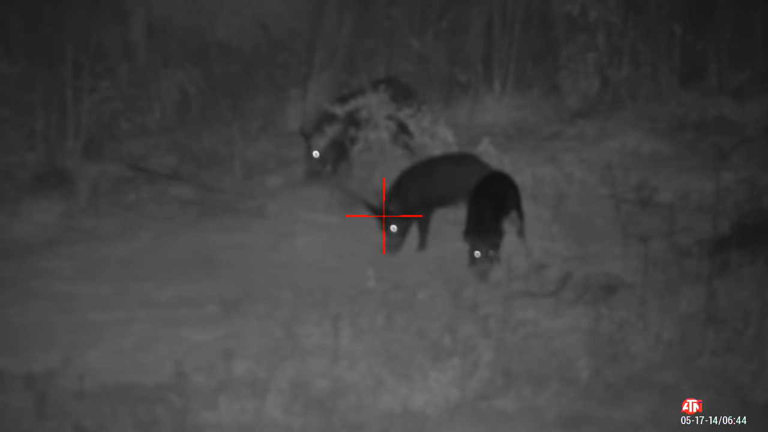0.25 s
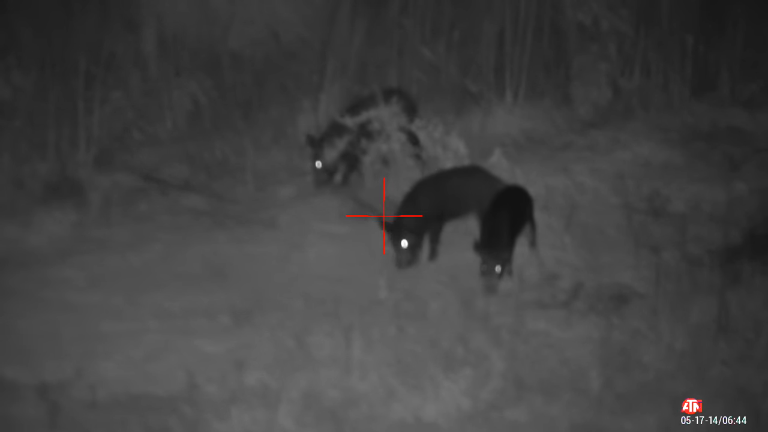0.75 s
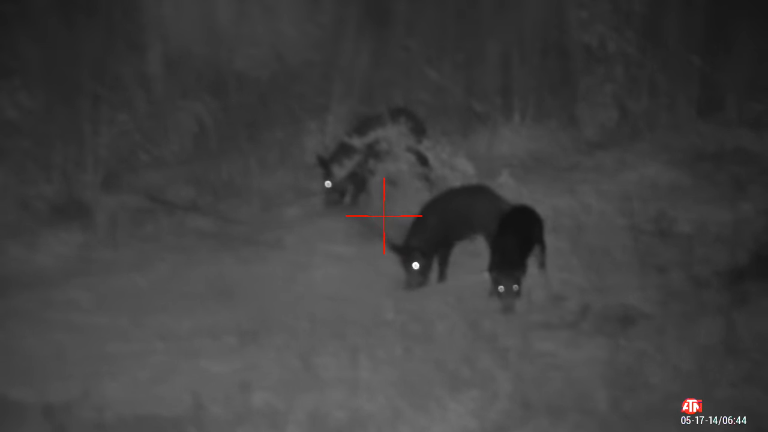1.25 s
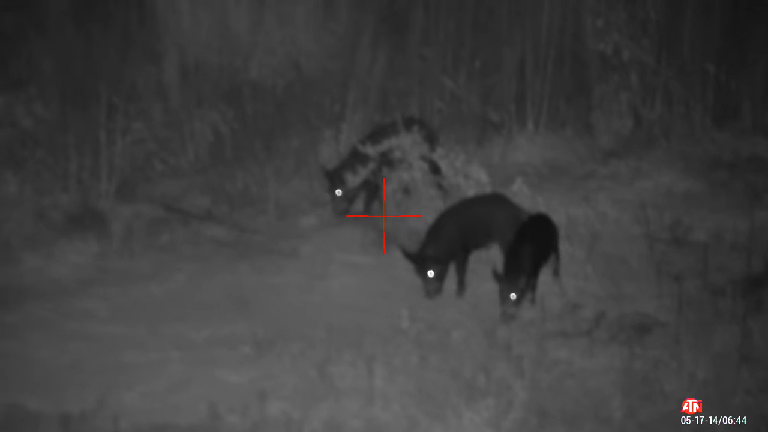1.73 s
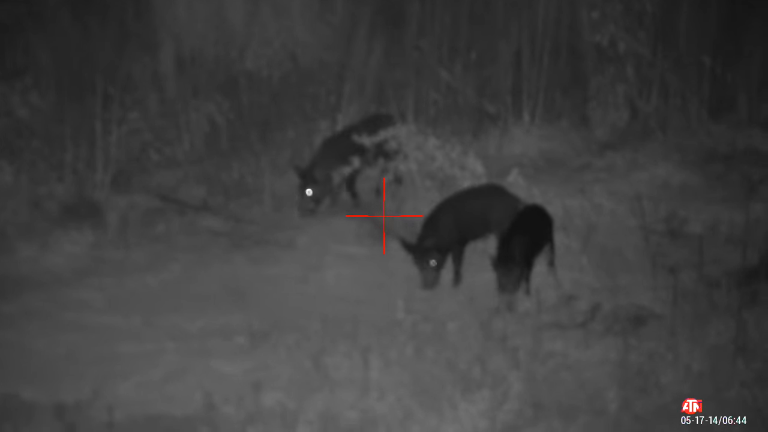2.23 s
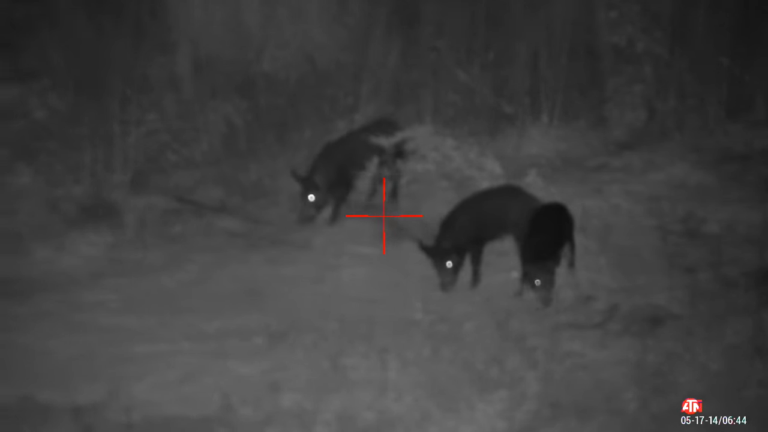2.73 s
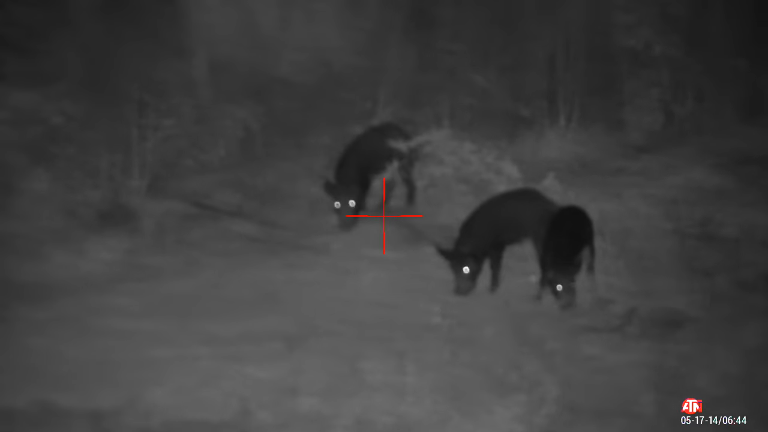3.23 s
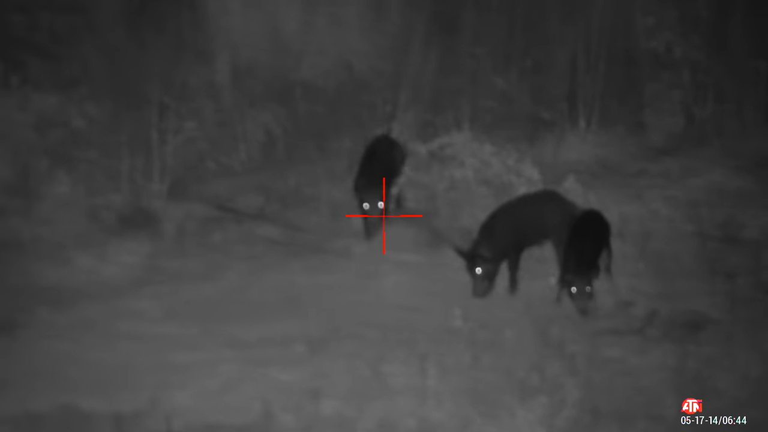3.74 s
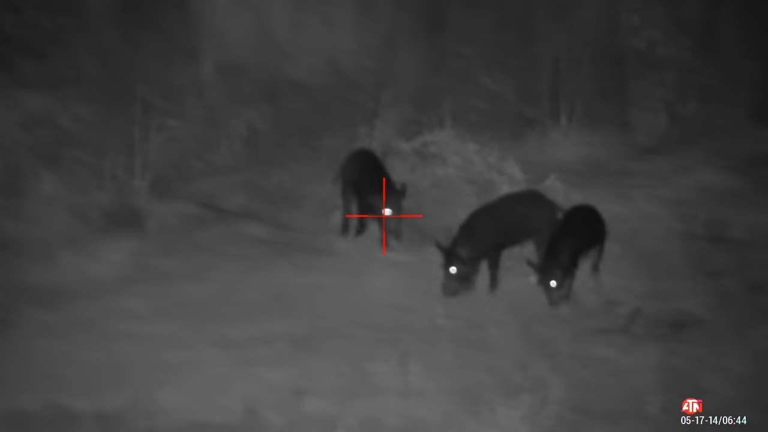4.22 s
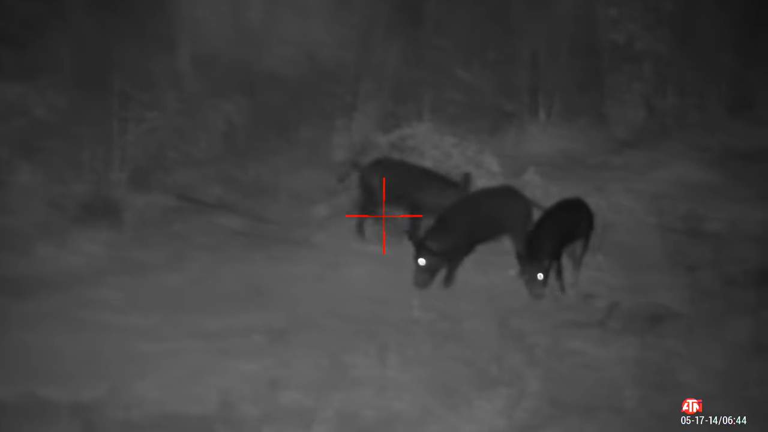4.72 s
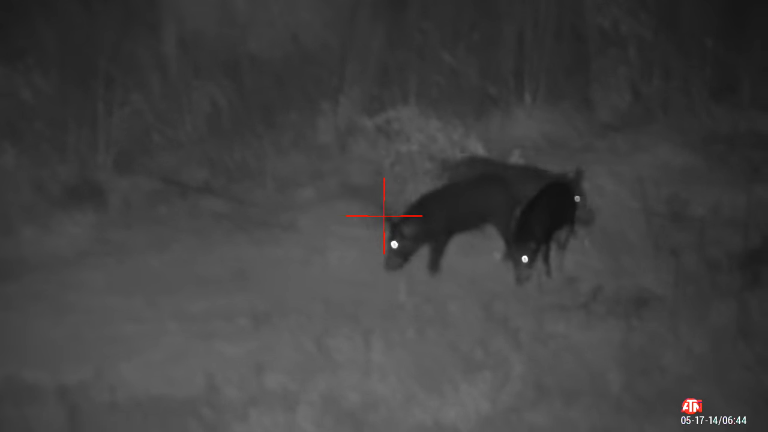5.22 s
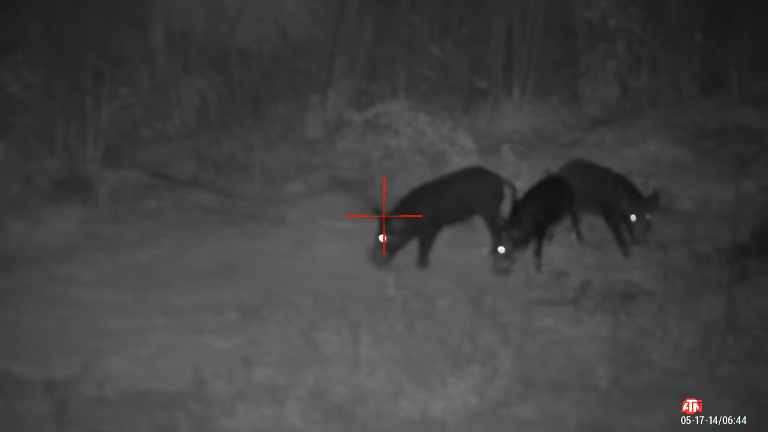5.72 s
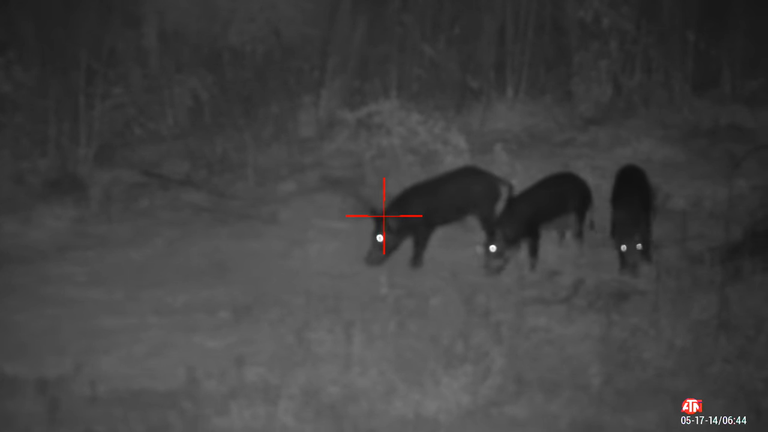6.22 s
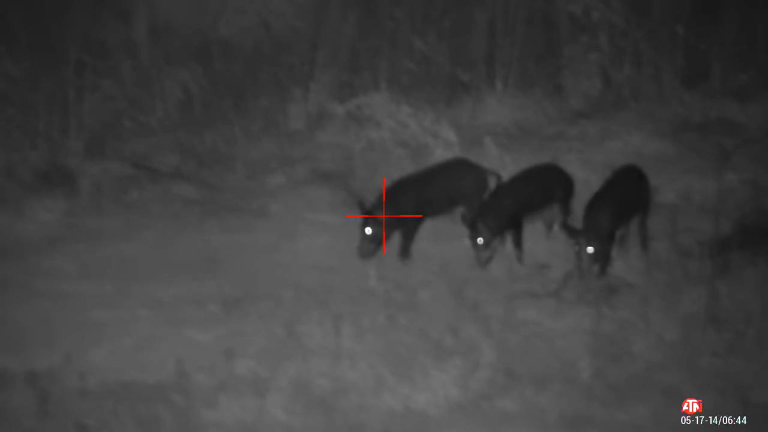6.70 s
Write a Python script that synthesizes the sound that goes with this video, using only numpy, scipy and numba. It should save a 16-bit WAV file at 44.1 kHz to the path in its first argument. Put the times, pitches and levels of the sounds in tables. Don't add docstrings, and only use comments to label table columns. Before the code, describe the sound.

High-pitched insects ring without pause across a dark clearing, over soft hiss and a faint low electrical buzz, with small twig snaps from foraging pigs.

```python
import sys
import numpy as np
from scipy import signal
from scipy.fft import rfft, irfft
from scipy.io import wavfile
from numba import njit

SR = 44100
rng = np.random.default_rng(int(sys.argv[2]) if len(sys.argv) > 2 else 0)


def generate_wav(signal):
    frames = np.transpose(np.atleast_2d(signal))
    scaled = np.clip(frames, -1, 1) * 32767
    pcm = np.round(scaled).astype(np.int16)
    wavfile.write(sys.argv[1], SR, pcm)


def ratio_of_db(decibels):
    return 10 ** (np.asarray(decibels, float) / 20)


N = 306936


def level(x, db):
    return x * ratio_of_db(db) / np.sqrt(np.mean(x ** 2))


@njit
def strokes(start, length, hz, fall, size, phase):
    out = np.zeros(N)
    for j in range(len(start)):
        n = int(length[j])
        tone = size[j] * np.exp(1j * phase[j])
        step = np.exp(2j * np.pi * hz[j] * (1 + fall[j] / 2) / SR)
        bend = np.exp(-2j * np.pi * hz[j] * fall[j] / SR / n)
        window, turn = 1 + 0j, np.exp(2j * np.pi / n)
        for i in range(int(start[j]), int(start[j]) + n):
            if 0 <= i < N:
                out[i] += tone.imag * (1 - window.real) ** 2 / 4
            tone *= step
            step *= bend
            window *= turn
    return out


# f/Hz, level/dB [per Hz]
HISS_COLOUR = [(25, -128), (60, -116), (100, -108), (140, -103), (200, -98), (300, -91), (500, -90),
               (1000, -92), (2350, -97.5), (4150, -92), (7000, -101.3), (9000, -104.5), (13600, -106.5),
               (14700, -104)]


def hiss():
    hz, db = np.transpose(HISS_COLOUR)
    bins = np.arange(N // 2 + 1) * SR / N + 1
    colour = ratio_of_db(np.interp(np.log(bins), np.log(hz), db)) * np.sqrt(SR / 2)
    return irfft(rfft(rng.standard_normal(N)) * colour, N)


# f/picture rate [multiple], level/dB
BUZZ_PARTIALS = [(2, -106.0), (3, -97.4), (4, -86.1), (5, -85.0), (6, -76.7), (7, -76.5), (8, -79.3),
                 (9, -80.8), (10, -72.3), (11, -70.2), (12, -72.1), (13, -71.7), (14, -80.1), (15, -74.1),
                 (16, -76.0), (17, -77.1), (18, -88.0), (19, -80.8), (20, -81.2), (22, -70.4), (25, -85.2),
                 (26, -84.2), (27, -84.2), (35, -92.3), (44, -79.1), (66, -87.0)]
PICTURE_HZ = 30000 / 1001
BUZZ_DELAY, BUZZ_NOTCHES = 0.2, (9, 15.5)
BUZZ_LAG = 0.5


def buzz():
    turns = np.arange(N) * PICTURE_HZ / SR - BUZZ_DELAY
    out = np.zeros(N)
    for k, db in BUZZ_PARTIALS:
        sign = (-1) ** np.searchsorted(BUZZ_NOTCHES, k)
        out += np.sqrt(2) * ratio_of_db(db) * sign * np.cos(2 * np.pi * k * turns - BUZZ_LAG)
    return out


# t/s, f/Hz, length/s, fall of pitch [0-1], peak level/dB
PIG_SOUNDS = [
    (.565, 115, 0.026, 0.3, -66),
    (.905, 520, 0.054, 0, -56),
    (.955, 456, 0.054, 0.1, -52),
    (2.225, 105, .04, .3, -71),
    (3.494, 1650, 0.0054, 0.4, -50),
    (3.853, 105, .04, .3, -68),
    (4.061, 2380, .004, 0, -42),
    (5.218, 105, .04, .3, -71),
    (5.37, 2350, .006, .1, -48),
    (6.6, 1516, .035, 0, -62),
]


def pigs():
    s, hz, length_s, fall, db = np.transpose(PIG_SOUNDS)
    return strokes(s * SR, length_s * SR, hz, fall, ratio_of_db(db), 0 * s)


GLIDE = 0.011


def trill(hz, scatter_hz, rate, first_s, duty, slip, chance):
    jitter, pitch, size, turn = chance.T
    stroke = np.arange(-1, len(turn) - 1)
    start = np.round((first_s + (stroke - duty / 2 + 0.027 * jitter) / rate) * SR)
    phase = 2 * np.pi * hz * start / SR + slip * np.cumsum(turn)
    flat = np.ones(len(turn))
    return np.array([start, flat * duty * SR / rate, hz + scatter_hz * pitch,
                     GLIDE * flat, ratio_of_db(1.26 * size), phase])


def crowd(hz, spread_hz, rate, duty, db, count):
    place = np.linspace(-2.6, 2.6, count)
    own = rng.standard_normal((count, 3))
    chance = np.clip(rng.standard_normal((count, 520, 4)), -2, 2)
    singers = []
    for p, (tempo, lag, far), c in zip(place, own, chance):
        own_rate = rate * (1 + 0.08 * np.tanh(tempo))
        start, length, pitch, fall, size, phase = trill(
            hz + spread_hz * p, 0.28 * spread_hz, own_rate, lag / rate, min(duty, 1), np.pi, c)
        size = size * ratio_of_db(far - 3.02 * p * p)
        singers.append(np.array([start, 0.92 * length, pitch, 0.78 * fall, size, 0.99 * phase]))
    return level(strokes(*np.concatenate(singers, axis=1)), db)


# wing f/Hz, spread f/Hz, pulse rate [per s], share of the cycle sounding [0-1], level/dB
FAR_CROWDS = [(4872, 195, 45., 0.53, -40.5), (3481, 215, 44., 0.53, -49), (2100, 45, 50., 0.73, -62),
              (5605, 110, 50., 0.57, -54), (2672, 70, 43., 0.61, -64.5), (3073, 87, 32., 0.67, -63),
              (7830, 400, 55., 0.32, -72.5), (12200, 450, 53, 0.3, -84), (6490, 240, 56, 0.42, -72),
              (5650, 290, 40., .45, -55.5)]
CROWD_SIZES = (130, 110, 24, 30, 16, 18, 60, 60, 50, 80)
# t/s, level/dB
MAIN_EFFORT = [(0.0, -41), (0.02, -38.5), (0.56, -41), (5.35, -40), (5.66, -41.5), (5.7, -36.5),
               (5.74, -39.5), (5.91, -41), (6.82, -40), (6.96, -40)]
# which crowd, chirp rate [per s], crest of the first chirp t/s
CHIRP_BEATS = [(1, 3.13, .128), (3, 12.41, -.004)]
# rise at the crest level/dB, sharpness [power]
CHIRP_CRESTS = [(3.0, 3.5), (5.0, 1.1)]


def far_crickets():
    t = np.arange(N) / SR
    songs = [crowd(*row, count=n) for row, n in zip(FAR_CROWDS, CROWD_SIZES)]
    s, db = np.transpose(MAIN_EFFORT)
    songs[0] = songs[0] * level(ratio_of_db(np.interp(t, s, db)), 0)
    for (k, rate, first_s), (rise_db, sharp) in zip(CHIRP_BEATS, CHIRP_CRESTS):
        crest = np.abs(np.cos(np.pi * rate * (t - first_s))) ** (2 * sharp)
        songs[k] = songs[k] * level(ratio_of_db(rise_db * crest), 0)
    return sum(songs)


def solo(scatter_hz, duty, slip, db, from_s, to_s, hz, rate, first_s):
    chance = rng.standard_normal((480, 4))
    song = level(strokes(*trill(hz, scatter_hz, rate, first_s, min(duty, 1), slip, chance)), db)
    t = np.arange(N) / SR
    return song * np.clip(np.minimum(t - from_s + 0.026, to_s - t) / 0.03, 0, 1)


WOODS_T60_S, WOODS_DB = 0.64, 1


def woods(x, size=8192):
    t = np.arange(SR // 2) / SR
    shape = np.exp(-np.log(1000) * t / WOODS_T60_S) * np.clip(t / 0.0058, 0, 1)
    wet = np.zeros(N + 2 * SR)
    padded = np.pad(x, (size // 2, size))
    fade = np.sin(np.pi * np.arange(size) / size)
    for i in range(0, N + size // 2, size // 2):
        paths = shape * rng.standard_normal(len(t))
        echo = signal.fftconvolve(padded[i:i + size] * fade, paths)
        wet[i:i + len(echo)] += echo
    wet = wet[size // 2:][:N] / np.sqrt(np.sum(shape ** 2))
    return (x + ratio_of_db(WOODS_DB) * wet) / np.sqrt(1 + ratio_of_db(2 * WOODS_DB))


# pitch scatter f/Hz, share of the cycle sounding [0-1], phase slip per pulse [rad], level/dB
NEAR_SINGERS = [(10.2, 0.78, 0.57, -64.5), (20, 0.75, 1.53, -75.5), (15, 0.65, 1.356, -65),
                (40, 0.42, 2.532, -47), (8, 1, 1.01, -52.5), (42.3, 0.34, 2.48, -53),
                (25, 0.85, 0.9, -62.5), (30, .8, 2.2, -78), (5, 0.9, 0.4, -66), (50, 0.5, 2.47, -56.5),
                (12, .9, 1.55, -77)]
# from t/s, to t/s
NEAR_SPELLS = [(0, 7), (-1, 4.57), (1.5, 8), (0, 8), (-1, 8), (0.1, 8), (4, 8), (6, 8), (-1, 2.4), (-1, 8),
               (.5, 4.57)]
# wing f/Hz, pulse rate [per s], middle of the first pulse t/s
NEAR_VOICES = [(2593, 42.53, .018), (8260, 56.52, .007), (2985, 28.64, .0255), (4960, 45.95, .015),
               (5205, 45.9, .008), (4600, 44.15, .018), (2125, 52.5, .001), (7750, 56.6, .01),
               (2150, 51.5, .01), (3500, 44.7, .01), (8125, 56.52, .007)]


def near_crickets():
    singers = zip(NEAR_SINGERS, NEAR_SPELLS, NEAR_VOICES)
    return woods(sum(solo(*row, *spell, *voice) for row, spell, voice in singers))


def scene():
    return np.tile(hiss() + buzz() + pigs() + far_crickets() + near_crickets(), (2, 1))


def top_cut(x):
    return signal.sosfilt(signal.butter(12, 16330, fs=SR, output="sos"), x)


def record(dry):
    passed = np.arange(N // 2 + 1) * SR / N < 15280
    mix = irfft(rfft(dry) * passed, N)
    return top_cut(mix)


dry = scene()
out = record(dry)
generate_wav(out)
```